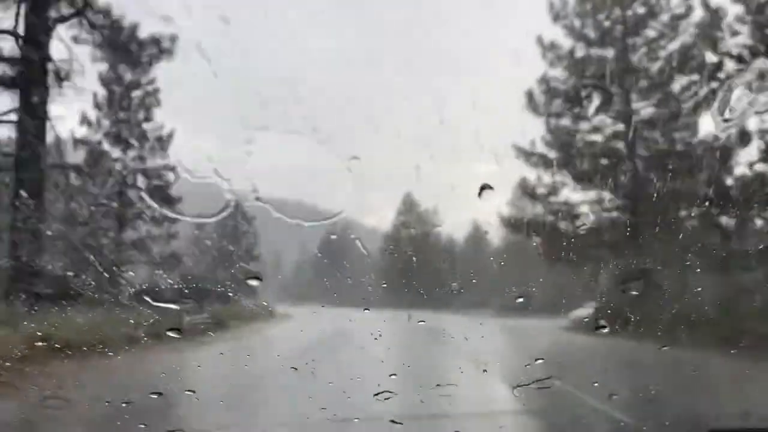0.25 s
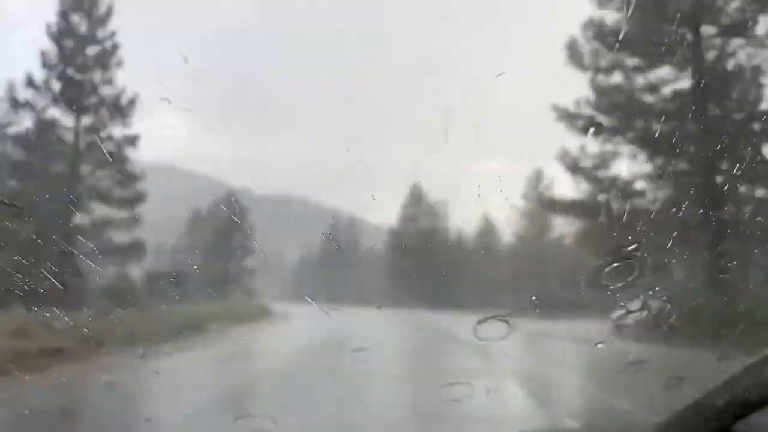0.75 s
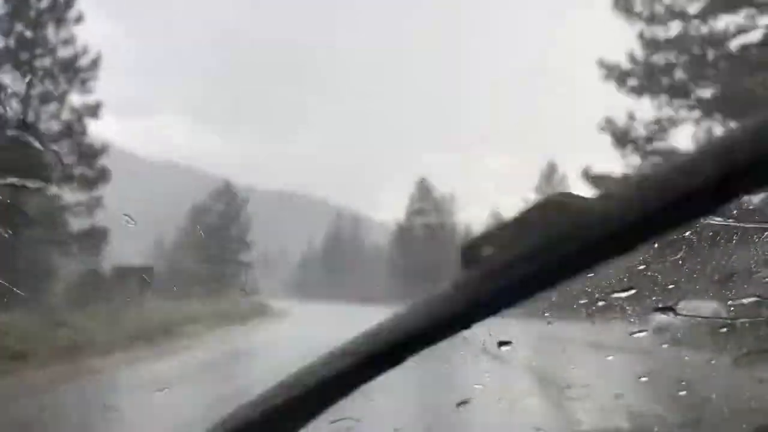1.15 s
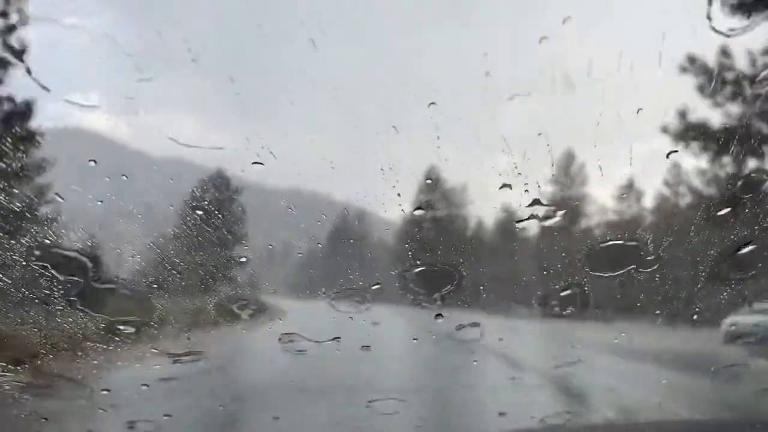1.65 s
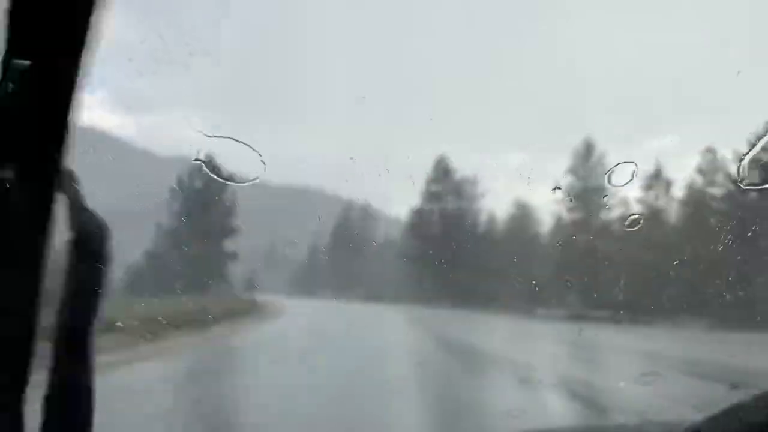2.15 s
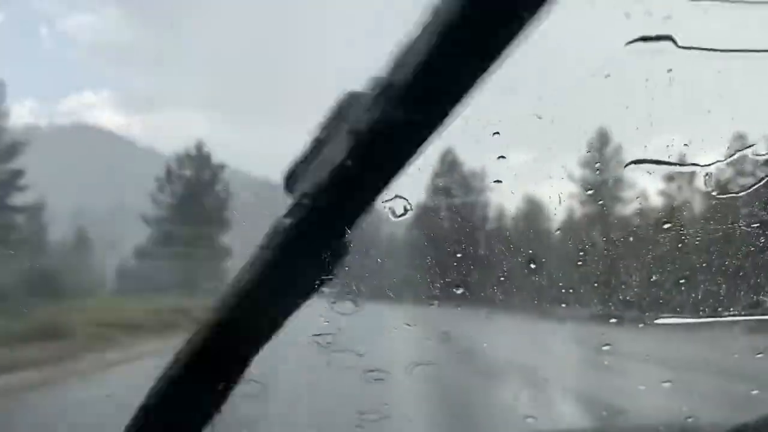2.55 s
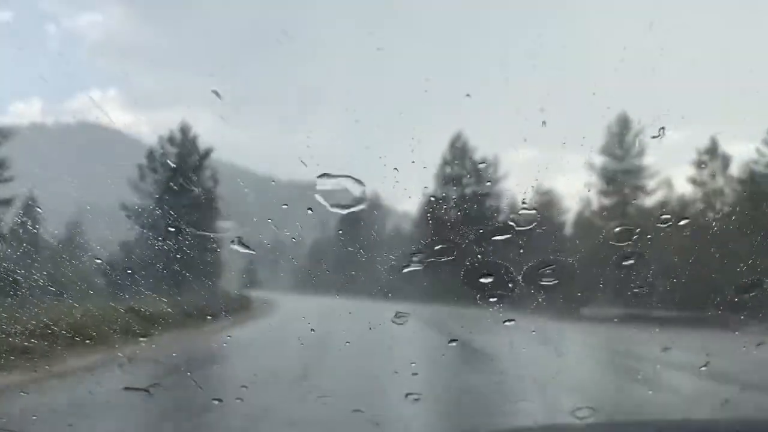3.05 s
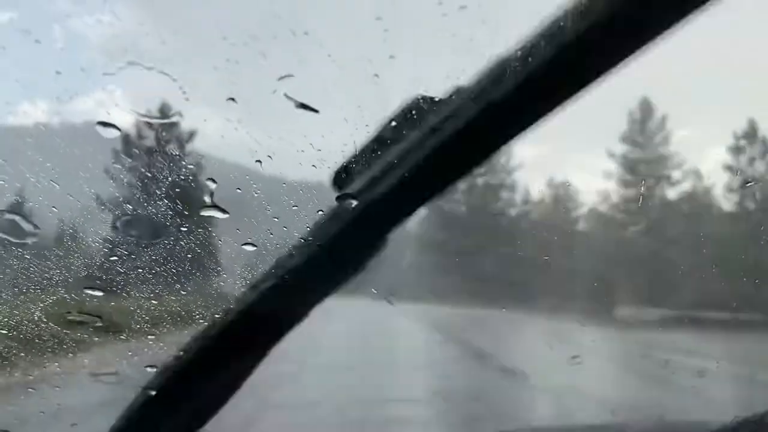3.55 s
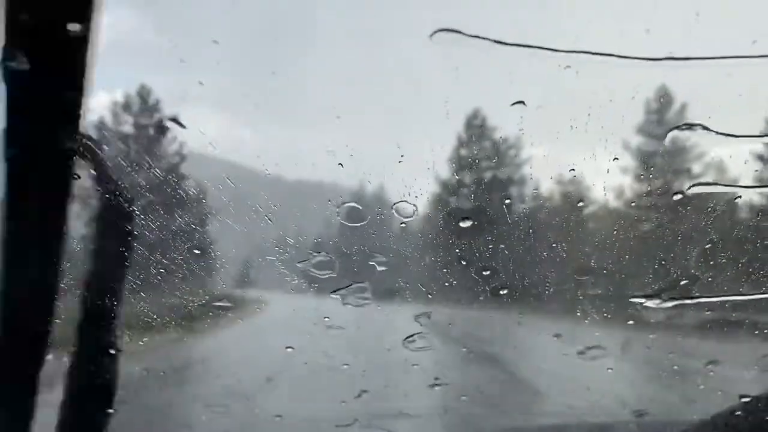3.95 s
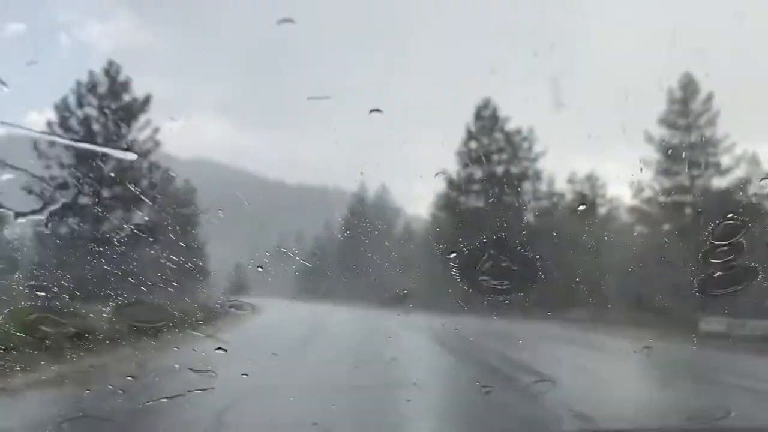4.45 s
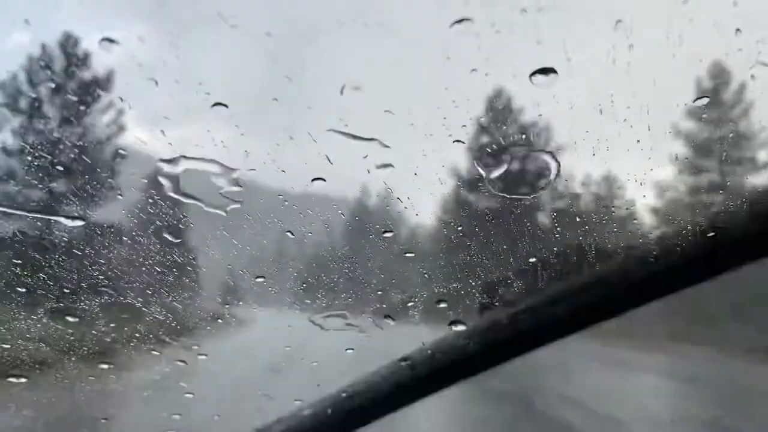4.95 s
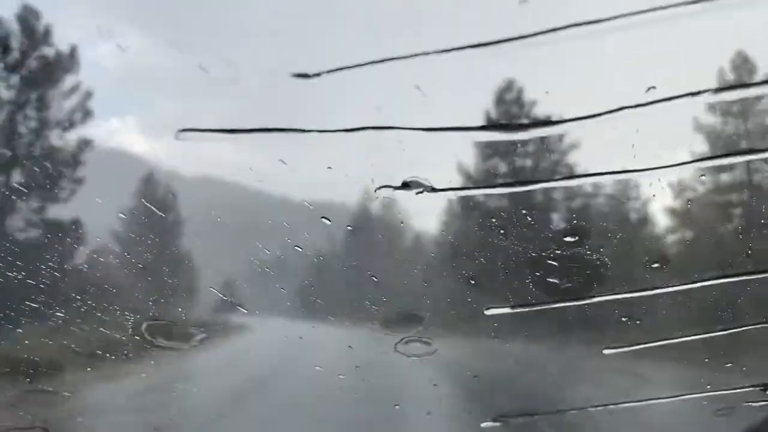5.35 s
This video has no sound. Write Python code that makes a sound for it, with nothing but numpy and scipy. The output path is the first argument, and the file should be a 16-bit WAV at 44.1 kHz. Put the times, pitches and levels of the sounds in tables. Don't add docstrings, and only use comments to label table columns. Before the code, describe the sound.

Heavy rain spatters sharply on a car's windshield and roof, heard from inside over a loud, steady, low cabin rumble.

```python
import sys
import numpy as np
from scipy import signal
from scipy.fft import rfft, irfft, next_fast_len
from scipy.io import wavfile
from scipy.ndimage import uniform_filter1d

SR = 44100
rng = np.random.default_rng(int(sys.argv[2]) if len(sys.argv) > 2 else 0)


def field_ratio(decibels):
    return 10 ** (np.asarray(decibels, dtype=float) / 20)


def inscribe(sig):
    pcm = np.round(np.clip(np.atleast_2d(sig).T, -1, 1) * 32767)
    wavfile.write(sys.argv[1], SR, pcm.astype(np.int16))


N = 247268
SPOTS, KERNEL = 24, 8192


def at_hz(points, hz):
    table_hz, values = np.array(points).T
    return np.interp(np.log(hz + 1), np.log(table_hz + 1), values)


def in_time(rows):
    s, *columns = np.transpose(rows)
    return [np.interp(np.arange(N) / SR, s, c) for c in columns]


def rms_one(x):
    return x / np.sqrt(np.mean(x ** 2) + 1e-20)


def split(x, low_hz=1500, high_hz=6000):
    low = signal.sosfilt(signal.butter(2, low_hz, fs=SR, output="sos"), x)
    high = signal.sosfilt(signal.butter(2, high_hz, "high", fs=SR, output="sos"), x)
    return low, x - low - high, high


def splash_responses(burst_s=(.006, .004, .0018), ring_t60_s=(.09, .07, .05),
                     ring_db=(-7, -9, -11), tick_db=(-6, 2.0, 1.5)):
    # (frequency [Hz], level [dB])
    glass = [(150, -12), (300, 3.5), (500, -1), (650, -4), (800, -0.5), (1300, -4.5), (1650, -2.5),
             (2100, -5), (2700, -2), (3400, 0.3), (3900, -5), (5200, -7.5), (6800, -12.5), (9000, -12),
             (11500, -18), (14500, -21), (16000, -21)]
    # (frequency [Hz], level [dB])
    left_louder = [(400, -0.5), (1500, -.5), (2500, 3.5), (3500, 1), (5200, 4), (6500, 0), (16000, 0)]
    # (frequency [Hz], share [0 to 1])
    likeness = [(150, .95), (300, .7), (600, .25), (1300, .25), (2200, .62), (4500, .5), (5600, .28),
                (6500, .6), (7500, .65), (9000, .86), (11000, .93), (16000, .93)]
    # (frequency [Hz], angle [radians])
    left_leads = [(0, 0), (650, 0), (1000, -3), (2250, .1), (3200, .75), (5600, .6), (6620, 0),
                  (15880, -15.7)]
    t = np.arange(KERNEL) / SR - .002
    rise = np.clip(t / 0.00024, 0, 1)
    noise = rng.standard_normal((3, SPOTS, KERNEL))
    hz = np.arange(KERNEL // 2 + 1) * SR / KERNEL
    alike = np.clip(at_hz(likeness, hz), 0, 1)
    lead = np.interp(hz, *np.transpose(left_leads))
    port = field_ratio(at_hz(left_louder, hz) / 2) * np.exp(.5j * lead)
    bands = []
    for part, burst, t60, level_db, hit_db in zip(split(noise), burst_s, ring_t60_s, ring_db, tick_db):
        tick = field_ratio(hit_db) * np.exp(-t / 0.001)
        splash = np.exp(-t / burst)
        ring = field_ratio(level_db - 60 * t / t60)
        shape = rise * (tick + splash + ring)
        common, own_left, own_right = rfft(part * shape) * field_ratio(at_hz(glass, hz))
        left = (np.sqrt(alike) * common + np.sqrt(1 - alike) * own_left) * port
        right = (np.sqrt(alike) * common + np.sqrt(1 - alike) * own_right) / port
        bands.append(irfft([left, right]))
    return np.array(bands)


def patter(responses, per_s, size_spread_db, thud_db, sparkle_db, spot_spread_db):
    size_db = size_spread_db * np.minimum(rng.exponential(1, N), 2)
    size = field_ratio(size_db) * rng.choice([-1, 1], N)
    hits = size * (rng.random(N) < per_s / SR)
    tint_db = spot_spread_db * rng.standard_normal((3, 1, SPOTS, 1))
    tint_db[0] += thud_db
    tint_db[2] += sparkle_db
    heard = (responses * field_ratio(tint_db)).sum(0)
    spot = rng.integers(0, SPOTS, N)
    length = next_fast_len(N + KERNEL)
    total = sum(rfft(hits * (spot == k), length) * rfft(heard[:, k], length) for k in range(SPOTS))
    return rms_one(irfft(total, length)[:, :N])


def lulls(deeper=0.92):
    # (time [s], length [s], depth [dB])
    pauses = [(0.064, 0.015, -5.5), (.14, .016, -2), (.44, 0.02, -3), (0.517, 0.016, -8),
              (0.724, 0.017, -9), (0.812, .012, -5), (1.225, 0.019, -9), (1.326, 0.021, -4),
              (1.385, 0.011, -1.5), (1.464, .014, -2.5), (1.591, 0.0086, -9), (1.806, .021, -3.5),
              (1.898, 0.016, -5), (2.015, 0.014, -1.5), (2.26, .014, -1), (2.352, .015, -3.5),
              (2.61, 0.011, -2.5), (3.136, 0.045, -5.5), (3.315, 0.014, -10), (3.386, .04, -1),
              (3.431, 0.018, -7.5), (3.583, 0.012, -5), (3.689, .014, -2.5), (4.03, 0.029, -1.5),
              (4.7, 0.012, -2), (4.992, 0.042, -2), (5.234, 0.024, -9.5), (5.38, .015, 0), (5.52, .014, -2)]
    t, dip_db = np.arange(N) / SR, 0
    for s, length, depth_db in pauses:
        corners = [s - .012, s, s + length, s + length + 0.00066]
        dip_db = dip_db + deeper * depth_db * np.interp(t, corners, [0, 1, 1, 0])
    return field_ratio(dip_db)


def shower(responses, gusts_per_s=30., gust_db=0.82):
    # (time [s], level [dB])
    shower_level = [(0.0, -32.5), (0.34, -30.5), (0.59, -32), (0.73, -33.5), (0.95, -30.5), (1.22, -32.5),
                    (1.78, -33), (2.11, -33), (2.31, -33), (2.97, -31.5), (3.25, -30), (3.62, -29),
                    (4.11, -34.5), (4.37, -32), (5.17, -33.5), (5.26, -31.5), (5.61, -34)]
    (shower_db,) = in_time(shower_level)
    small = patter(responses, 800., size_spread_db=5.0, thud_db=-3.5, sparkle_db=6.0, spot_spread_db=3.5)
    spray = patter(responses, 6000., size_spread_db=3.0, thud_db=1.5, sparkle_db=-2, spot_spread_db=1.0)
    gusts = rng.standard_normal(200)
    swing_db = gust_db * np.interp(np.arange(N) / SR * gusts_per_s, np.arange(200), gusts)
    return field_ratio(shower_db + swing_db) * lulls() * (field_ratio(3.0) * small + field_ratio(-2.0) * spray)


def big_drops(responses, trim_db):
    # (time [s], peak [dB], thud [dB])
    roof_drops = [(0.1082, -13, 3), (0.2189, -7.5, 6.5), (0.2811, -17, 18.5), (.3711, -22, 1),
                  (0.4778, -13, 1), (.534, -13, 1), (0.8143, -10.5, 1), (.9564, -17, 4), (1.3989, -8.5, 7),
                  (1.5187, -13, -1), (1.6696, -13.5, 0), (1.739, -16, 3), (1.913, -14, 10), (2.218, -17, 2),
                  (2.2987, -11.5, 5), (2.5068, -10, 1), (2.5815, -17, 10), (3.0193, -10, -8),
                  (3.184, -24, 12), (3.635, -14, 5), (3.739, -15, -1), (3.838, -15, 5), (4.03, -17, 12),
                  (4.777, -9.5, 5), (4.927, -9.5, 5), (4.974, -12, 9), (5.457, -13, 8), (5.5057, -13.5, 9),
                  (5.558, -11.5, 1)]
    # (time [s], peak [dB], sparkle [dB])
    glass_drops = [(0.0822, -20.5, 21), (0.158, -17, 12), (0.345, -4, 8.5), (0.4607, -13, 12),
                   (0.556, -9.5, 9.5), (0.7418, -19, 8), (0.7715, -8.5, 9), (1.3114, -14, 8),
                   (1.4808, -15, 10), (1.923, -13, 10.5), (1.9934, -14, 11.5), (2.081, -9.5, 7),
                   (2.135, -15.5, 15.5), (2.3902, -13.5, 11), (2.716, -11, 9), (3.0984, -14, 9),
                   (3.4417, -14, 11), (3.5315, -8, 9), (3.699, -8, 9), (4.1627, -15.5, 16),
                   (4.2413, -16.5, 14.5), (4.322, -21, 21), (4.3925, -11.5, 5), (4.5217, -11.5, 8.5),
                   (4.636, -17, 16), (5.058, -16, 12), (5.0783, -12.5, 12.5), (5.2574, -26.5, 20.5),
                   (5.396, -13.5, 8), (5.5417, -11, 8)]
    # (time [s], peak [dB], sparkle [dB])
    far_drops = [(0.055, -15.5, 9), (0.1865, -8.5, 0), (0.616, -21, 6), (0.9048, -17.5, 8),
                 (1.0964, -15, 6), (1.2467, -23, 6), (1.2677, -6, 3), (1.284, -7.5, 7), (1.5375, -10, -4),
                 (1.622, -18, -8), (1.854, -11, -10), (1.8723, -12, -9), (2.0314, -10.5, 7),
                 (2.2859, -10.5, -6), (2.362, -10.5, 3), (2.4827, -11, -6), (2.6236, -10.5, 4),
                 (2.7349, -11, 11), (2.8858, -10.5, -9), (3.48, -9.5, 8), (3.6015, -14, 2),
                 (3.7847, -10, -5), (4.098, -14, 9.5), (4.2052, -15, 8), (4.422, -10, 7), (4.612, -14.5, 7),
                 (4.7117, -12, 8), (4.7383, -12.5, 7), (5.1092, -9.5, 2), (5.4192, -7.5, 6)]
    # (time [s], peak [dB], sparkle [dB])
    edge_drops = [(0.015, -18, -5), (0.392, -11, 11.5), (0.86, -21, 6), (0.898, -19, 8), (0.982, -11.5, 5),
                  (1.005, -11.5, -2), (1.1456, -26, -2), (1.1692, -22, 0), (1.349, -14.5, 9),
                  (1.4995, -15, 2), (1.6032, -19, 7), (1.642, -18, 7), (2.072, -14, 3), (2.153, -20, 17),
                  (2.4613, -22, 12), (2.551, -14.5, 4), (2.78, -16, -4), (2.8153, -15, 4), (3.243, -11, 6),
                  (3.2924, -21, -3), (3.338, -22, -2), (3.901, -19, 13), (3.9543, -11.5, 6),
                  (4.2895, -18.5, 14.5), (4.352, -17, 16.5), (4.685, -16, 8), (4.799, -12.5, -6),
                  (4.8485, -13, 3), (5.04, -17, 6), (5.1474, -14, 9), (.4494, -24, 12), (1.262, -20, 13),
                  (1.343, -23, 12), (1.358, -18, 14), (1.37, -21, 11), (1.68, -13, 8), (2.5125, -14, 12),
                  (2.6763, -23, 13), (2.9407, -19, 13), (3.4695, -18, 9), (4.056, -22, 11), (4.062, -23, 9),
                  (4.0812, -21, 9), (4.336, -20, 15), (4.59, -20, 7), (4.8, -25, 5), (4.824, -23, 11),
                  (4.897, -21, 12), (5.033, -18, 11.5), (5.3772, -19, 10)]
    # (time [s], peak [dB], thud [dB])
    roof_knocks = [
        (1.5, -11, 14),
        (.318, -19, 10),
        (.487, -16, 8),
    ]
    roof_sparkle_db, glass_thud_db, far_thud_db, edge_thud_db = 7, -10, -11, -6
    drops = ([(s, db, thud, roof_sparkle_db) for s, db, thud in roof_drops]
             + [(s, db, glass_thud_db, sparkle) for s, db, sparkle in glass_drops]
             + [(s, db, far_thud_db, sparkle) for s, db, sparkle in far_drops]
             + [(s, db, edge_thud_db, sparkle) for s, db, sparkle in edge_drops]
             + [(s, db, thud, roof_sparkle_db) for s, db, thud in roof_knocks])
    out = np.zeros((2, N + KERNEL))
    stiff_glass = signal.butter(2, 550, "high", fs=SR, output="sos")
    for k, (s, peak_db, thud_db, sparkle_db) in enumerate(drops):
        low, middle, high = responses[:, :, k % SPOTS]
        thud = field_ratio(thud_db - 4.5) * signal.sosfilt(stiff_glass, low)
        splash = thud + middle + field_ratio(sparkle_db) * high
        start = max(round((s - .002) * SR), 0)
        out[:, start:start + KERNEL] += field_ratio(peak_db + trim_db) * splash / np.abs(middle + high).max()
    return out[:, :N]


def resonate(x, hz, width_hz):
    r = np.exp(-np.pi * width_hz / SR)
    return signal.lfilter([(1 - r * r) / 2, 0, (r * r - 1) / 2], [1, -2 * r * np.cos(2 * np.pi * hz / SR), r * r], x)


def jolts(rows, spread=0.34):
    t = np.arange(0, N, 128) / SR
    power = sum(field_ratio(2 * db) * np.exp(-((t - s) / (spread * length)) ** 2) for s, db, length in rows)
    return np.interp(np.arange(N) / SR, t, power)


def road(side_db=(-24, -21, -16, -10), axle_jolt_db=-9, evenness=0.77):
    # (time [s], roughness [dB])
    surface = [
        (0.0, -17),
        (0.36, -24.5),
        (0.87, -20),
        (1.05, -21.5),
        (3.03, -21),
        (3.25, -23.5),
        (3.72, -20.5),
        (3.83, -21.5),
        (4.25, -19),
        (5.61, -23.5),
    ]
    # (frequency [Hz], width [Hz], level [dB])
    cabin_modes = [
        [(41.5, 8.5, 3)],
        [(57.2, 11.3, 6), (66.3, 12.3, 3)],
        [(102.5, 18.2, 5), (117.76, 4.94, 1.5)],
        [(165.1, 20, 0.5), (224.2, 20.2, -4.5)],
    ]
    road_band_db = (-7.5, -6.5, -2, -11)
    road_follows = (1, 1, 0.72, 0.19)
    # (time [s], level [dB], length [s])
    body_jolts = [(0.143, -19.5, 0.05), (0.25, -14.5, 0.035), (0.744, -8, 0.029), (0.815, -20, 0.051),
                  (0.98, -20, 0.084), (1.786, -23, 0.15), (2.321, -20.5, 0.065), (2.578, -18.5, 0.063),
                  (2.822, -30, 0.146), (2.887, -13.5, 0.072), (2.97, -18, 0.071), (3.161, -23, 0.083),
                  (3.298, -17, 0.067), (3.497, -17, 0.035), (3.602, -18.5, 0.087), (3.734, -26, 0.11),
                  (3.798, -18.5, 0.11), (4.11, -24, 0.16), (4.17, -15.5, 0.049), (4.497, -25, 0.14),
                  (4.857, -14.5, 0.063), (5.019, -17.5, 0.051), (5.17, -21, 0.091), (5.311, -12, 0.074),
                  (5.383, -18.5, 0.1), (5.583, -16, 0.11)]
    # (time [s], level [dB], length [s])
    cabin_jolts = [(0.031, -25, 0.035), (0.1, -20, 0.068), (0.228, -18, 0.075), (0.739, -20, 0.033),
                   (0.967, -18, 0.06), (1.225, -14, 0.034), (1.371, -19.5, 0.084), (1.507, -10, 0.043),
                   (1.663, -20.5, 0.12), (2.188, -20, 0.16), (2.38, -17, 0.11), (2.478, -16.5, 0.035),
                   (2.661, -16.5, 0.037), (2.86, -22, 0.061), (2.988, -27, 0.15), (3.135, -17, 0.15),
                   (3.479, -15.5, 0.089), (3.818, -19.5, 0.13), (3.975, -17, 0.031), (4.081, -14.5, 0.046),
                   (4.147, -16, 0.035), (4.313, -16, 0.054), (4.477, -11, 0.025), (4.54, -21.5, 0.31),
                   (4.663, -20, 0.026), (4.77, -14, 0.063), (4.836, -11, 0.049), (4.913, -17, 0.063),
                   (5.112, -18.5, 0.052), (5.236, -17.5, 0.097)]
    # (time [s], level [dB], length [s])
    panel_jolts = [(.23, -30, 0.15), (.46, -35, 0.11), (.73, -29, 0.071), (1.21, -28.5, 0.18),
                   (1.76, -26.5, 0.14), (1.92, -27.5, 0.12), (2.26, -29.5, 0.16), (2.87, -25, 0.13),
                   (3.09, -29, 0.16), (3.66, -30.5, 0.13), (4.33, -37, 0.11), (4.67, -33, .1),
                   (4.85, -33, .06), (5.1, -29.5, .08), (5.29, -29, 0.099), (5.59, -30.5, .1)]
    out, (rough_db,) = 0, in_time(surface)
    usual_db = rough_db.mean()
    bounce = jolts(body_jolts)
    knocks = field_ratio(2 * axle_jolt_db) * bounce, bounce, jolts(cabin_jolts), jolts(panel_jolts)
    for band_db, follows, knock, modes, apart_db in zip(road_band_db, road_follows, knocks, cabin_modes, side_db):
        steady_db = band_db + usual_db + follows * (rough_db - usual_db)
        level = np.sqrt(field_ratio(2 * steady_db) + knock)
        noise = rng.standard_normal((2, N + SR))
        boom = sum(field_ratio(db) * resonate(resonate(noise, hz, width), hz, 3 * width) for hz, width, db in modes)
        boom = boom[:, SR:]
        swell = np.sqrt(uniform_filter1d(boom ** 2, size=2600) + 1e-12)
        mid, side = [rms_one(b) for b in boom / swell ** evenness]
        both_ports = mid * field_ratio([[.5], [-.5]])
        out = out + level * (both_ports + field_ratio(apart_db) * side * [[1], [-1]])
    return out


def tyre_hiss(level_db=-39, low_hz=330, high_hz=1700, flutter_db=2.5):
    arches = signal.butter(2, [low_hz, high_hz], "band", fs=SR, output="sos")
    wash = signal.sosfilt(arches, rng.standard_normal((2, N)))
    flutter = rms_one(uniform_filter1d(rng.standard_normal(N), size=2000))
    return field_ratio(level_db + flutter_db * flutter) * rms_one(wash)


def scene():
    responses = splash_responses()
    rain = shower(responses) + big_drops(responses, trim_db=-0.27)
    return rain + road() + tyre_hiss()


def band_limit(x):
    return signal.sosfilt(signal.butter(12, 16050, fs=SR, output="sos"), x)


def record(dry):
    heard = signal.sosfilt(signal.butter(3, 33, "high", fs=SR, output="sos"), dry)
    rounded = 1.6 * np.tanh(heard / 1.6)
    mix = signal.sosfilt(signal.cheby2(12, 60, 16200, fs=SR, output="sos"), rounded)
    return band_limit(mix)


dry = scene()
out = record(dry)
inscribe(out)
```